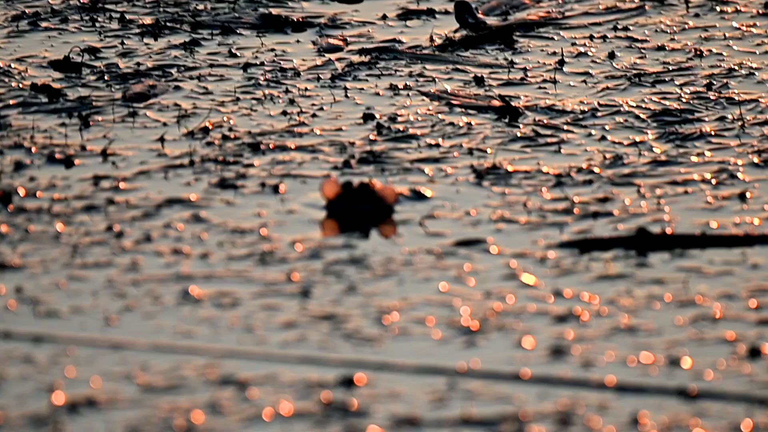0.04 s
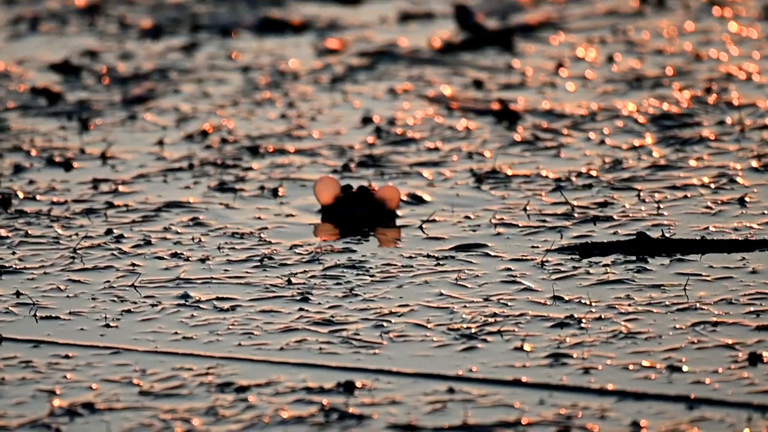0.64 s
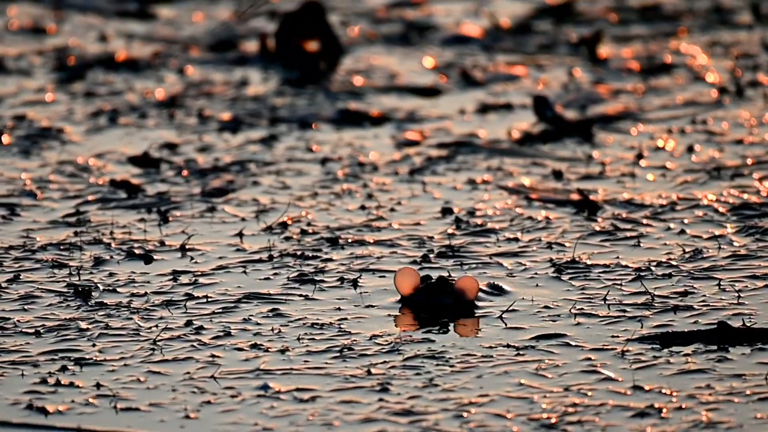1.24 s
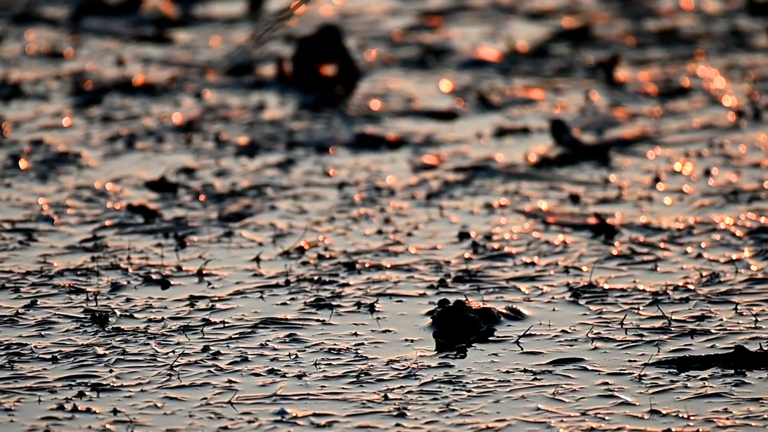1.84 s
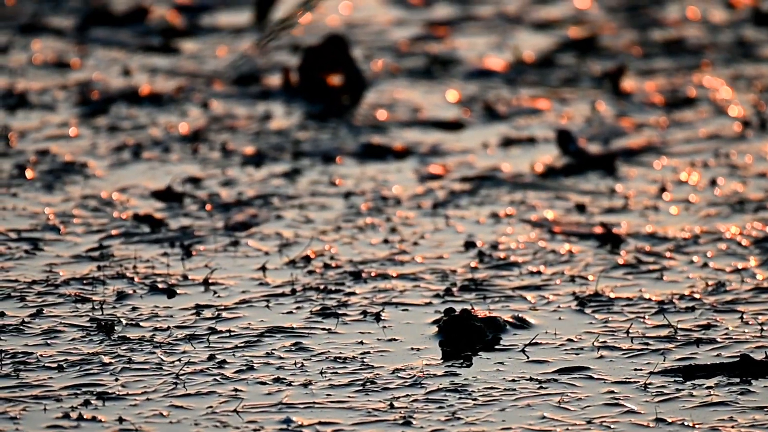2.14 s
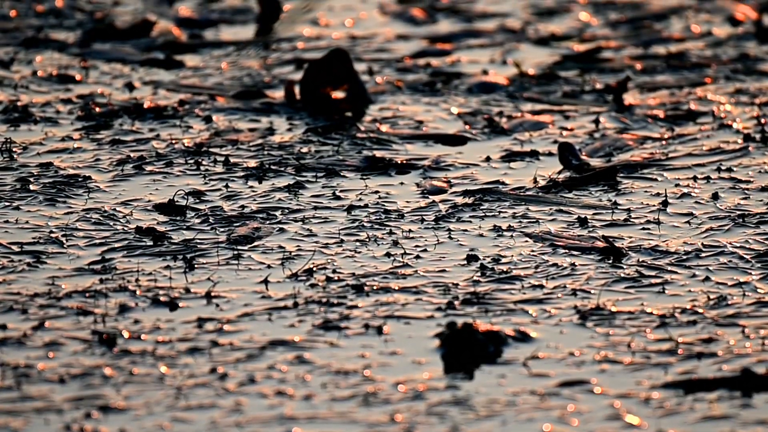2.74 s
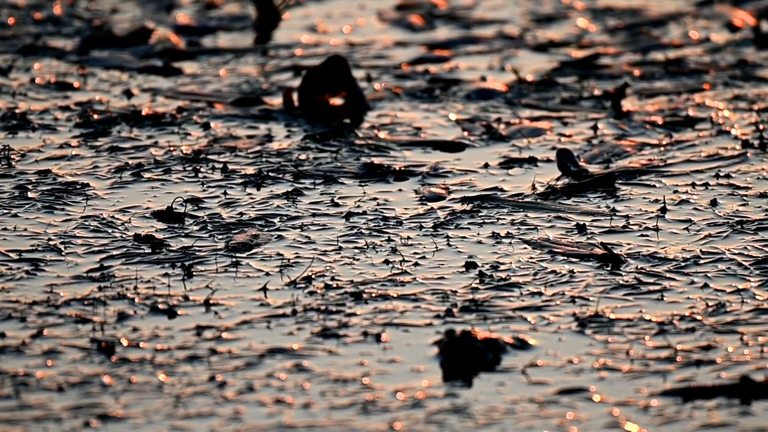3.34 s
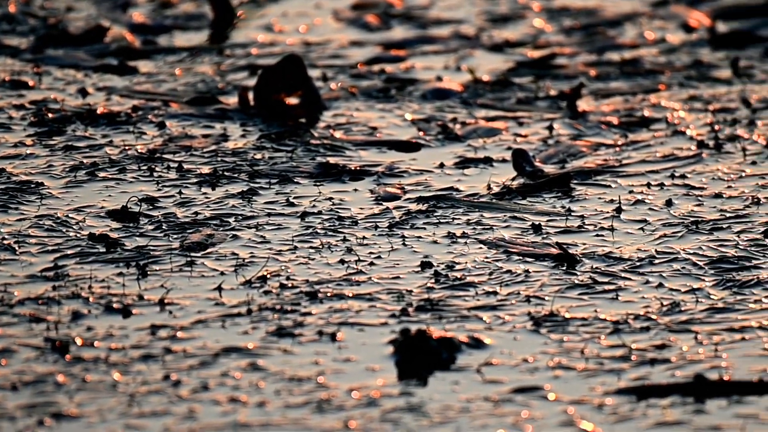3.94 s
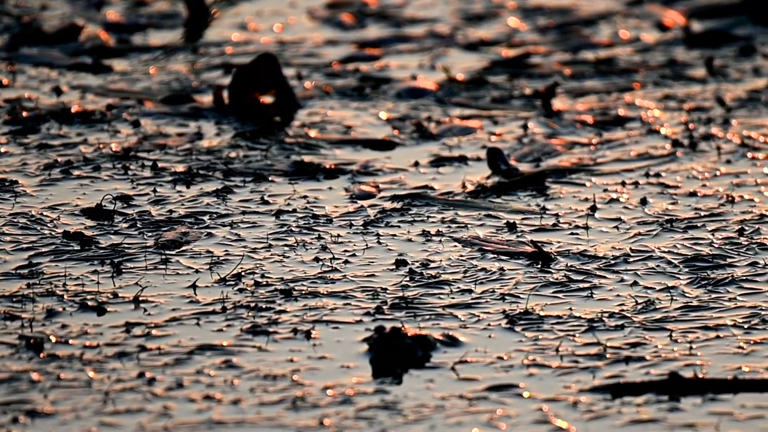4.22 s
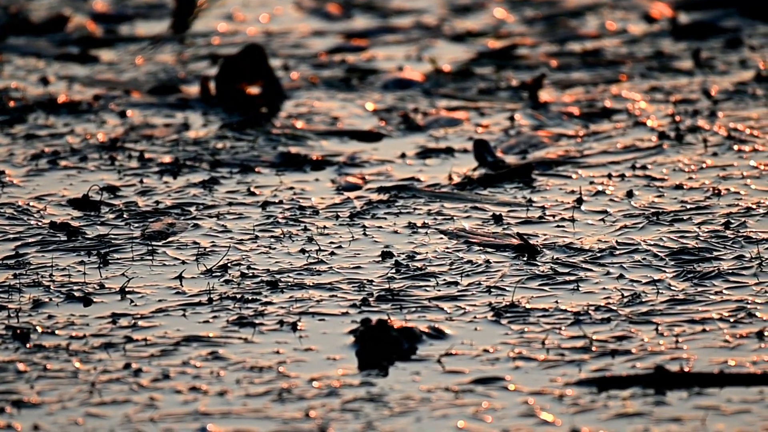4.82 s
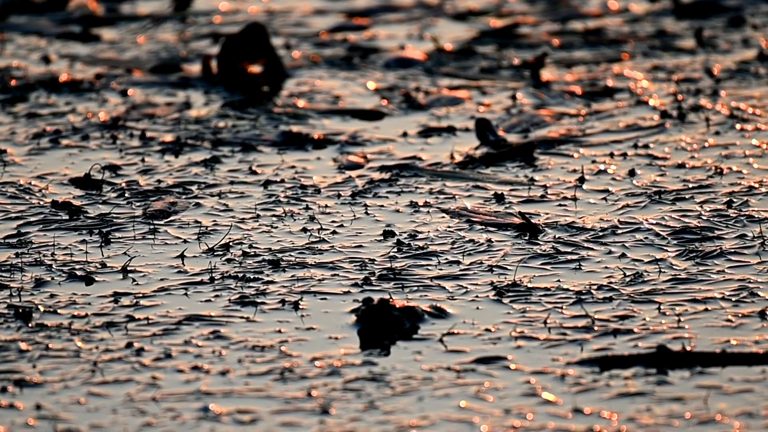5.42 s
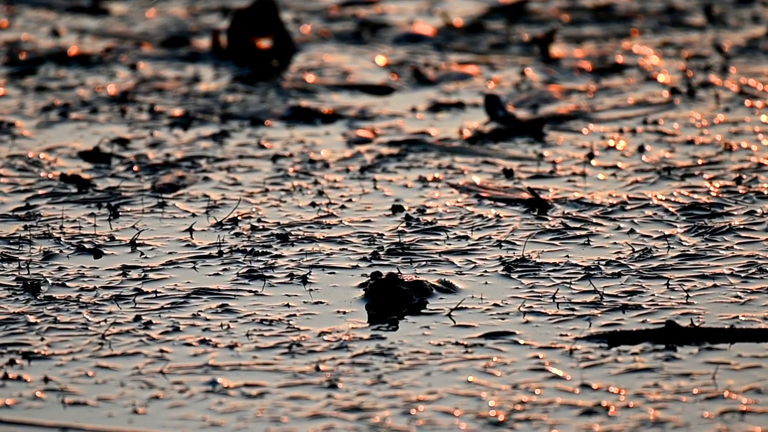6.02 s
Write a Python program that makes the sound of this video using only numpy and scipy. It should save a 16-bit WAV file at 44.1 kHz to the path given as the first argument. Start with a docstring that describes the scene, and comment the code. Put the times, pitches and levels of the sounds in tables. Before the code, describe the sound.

Several frogs call close by on an open pond, in stereo with a short echo. From 0.1 seconds a pulsed rattle and a run of sharp quacks, left and centre, sound over a low rumble with soft handling bumps. Short, rough, wavering croaks follow from about 0.7 to 2.2 seconds, and a far bird gives thin whistles between 1 and 1.5 seconds. The rumble settles by 3 seconds. Five more rattles lead, slightly right, at about 2.3, 3.1, 4, 4.8 and 5.7 seconds, each around half a second long, swelling and brightening before fading. Quacks on the left come around 2 to 2.5, 4 and 6 seconds, with croaks on the right between them. The bird returns faintly at 5.3 seconds. Throughout there is a soft hush, a distant frog chorus and scattered faint, high camera ticks, with a thin hiss swelling briefly near 0.8 and 3.2 seconds.

```python
"""Water frogs on a weedy pond at dusk, in stereo; each call is a pulse train ringing throat and sacs.
A slow rattle and sharp quacks open over a low rumble with soft handling bumps. Wavering croaks follow;
a far bird whistles at 1-1.5 s. From 2.3 s five more rattles lead, among quacks and croaks. The rumble
settles by 3 s; the bird returns at 5.3 s. Throughout: a hush, a distant chorus, faint camera ticks."""
import sys
import numpy as np
from scipy import signal
from scipy.fft import rfft, irfft, next_fast_len
from scipy.io import wavfile
from scipy.ndimage import uniform_filter1d

SR = 44100
rng = np.random.default_rng(int(sys.argv[2]) if len(sys.argv) > 2 else 0)


def output_pcm(signal):
    """Save a mono or channel-first signal as 16-bit PCM at the path in sys.argv[1].

    Samples are clipped to [-1, 1] before scaling.
    """
    pcm = np.clip(np.atleast_2d(signal).T, -1, 1) * 32767
    wavfile.write(sys.argv[1], SR, np.round(pcm).astype(np.int16))


N = 267687
TIME_S = np.arange(N) / SR
BIN_HZ = np.fft.rfftfreq(N, 1 / SR)
CROAK_ARCH = 0.083  # relative pitch rise with effort


def gain_of(db):
    return 10 ** (np.asarray(db) / 20)


def unit_rms(x):
    return x / np.sqrt(np.mean(x ** 2) + 1e-20)


def curve_at(points, hz):
    """Interpolate (freq_hz, value) points over log frequency."""
    freq_hz, value = np.transpose(points)
    return np.interp(np.log(hz + 1), np.log(freq_hz + 1), value)


def add(mix, start_s, sound):
    part = mix[max(round(start_s * SR), 0):][:len(sound)]
    part += sound[:len(part)]


def butter(x, order, edge_hz, kind="low"):
    return signal.sosfilt(signal.butter(order, edge_hz, kind, fs=SR, output="sos"), x)


def resonate(x, hz, width_hz):
    """Unity-gain resonance; the centre may move."""
    carrier = np.exp(2j * np.pi * np.cumsum(hz * np.ones(len(x))) / SR)
    pole = np.exp(-np.pi * width_hz / SR)
    return 2 * (carrier * signal.lfilter([1 - pole], [1, -pole], x / carrier + 1e-18)).real


def pulses(times_s, sizes, count):
    """Band-limited clicks at sub-sample times."""
    centre = np.asarray(times_s)[:, None] * SR
    taps = np.floor(centre) + np.arange(-7, 9)
    shape = np.sinc(taps - centre) * np.cos(np.pi * (taps - centre) / 16) ** 2
    index = np.maximum(taps, 0).astype(int)
    return np.bincount(index.ravel(), (shape * sizes[:, None]).ravel(), count)[:count]


def noise(spectrum):
    """Unit-rms noise shaped by (freq_hz, density_db) points."""
    return unit_rms(irfft(rfft(rng.standard_normal(N)) * gain_of(curve_at(spectrum, BIN_HZ)), N))


def pond(x, early_db=7, early_s=0.024, echoes_per_s=2500):
    """Sparse echoes from weed and banks, strongest at first, different at each microphone."""
    # freq_hz, t60_s
    decay = [(500, 0.45), (12000, 0.16)]
    taps = rng.standard_normal((2, SR // 2)) * (rng.random((2, SR // 2)) < echoes_per_s / SR)
    taps[:, :SR // 400] = 0  # 2.5 ms pre-delay
    hz, t, bands = signal.stft(taps, SR, nperseg=128)
    fade = gain_of(-60 * t / curve_at(decay, hz)[:, None])
    early = gain_of(early_db) * np.exp(-t / early_s)
    tail = signal.istft(bands * (fade + early), SR)[1]
    tail /= np.linalg.norm(tail, axis=1, keepdims=True)
    return signal.fftconvolve(x[None], tail, axes=1)[:, :N]


def place(x, pan_db, lead_ms, echo_db):
    """The nearer microphone hears a source earlier and louder (positive: left); the pond echoes."""
    side, size = np.array([[.5], [-.5]]), next_fast_len(N)
    shift = np.exp(2j * np.pi * np.fft.rfftfreq(size, 1 / SR) * side * lead_ms / 1000)
    direct = irfft(rfft(x, size) * shift, size)[:, :N]
    return gain_of(side * pan_db) * (direct + gain_of(echo_db) * pond(x))


def hush(level_db=-45.5):
    """Steady open air, wider toward the treble."""
    # freq_hz, density_db
    spectrum = [(15, -8.5), (25, -7.5), (249, -7), (363, -15.5), (503, -10), (734, -8), (863, -11.5),
                (1160, -10), (1370, -20), (2800, -19), (4250, -29), (16000, -45.5)]
    # freq_hz, left_right_coherence
    likeness = [(500, 0.93), (2000, 0.47), (12000, 0.067)]
    coherence = curve_at(likeness, BIN_HZ)
    width = np.sqrt((1 - coherence) / (1 + coherence + 1e-6))
    mid = noise(spectrum)
    side = irfft(rfft(noise(spectrum)) * width, N)
    return gain_of(level_db) * np.array([mid + side, mid - side])


def rumble(bumps_db=4.5):
    """A low rumble with soft handling bumps; it settles."""
    # freq_hz, density_db
    spectrum = [(25, -1), (60, 5), (115, -1.5), (250, -39), (3000, -120)]
    # time_s, level_db
    envelope = [(.1, -48), (1.4, -52), (2, -54), (3, -63)]
    settling = gain_of(np.interp(TIME_S, *np.transpose(envelope))) * noise(spectrum)
    return settling * gain_of(bumps_db * noise([(8, 0), (30, -80)]))


def hiss():
    """Thin high hiss that swells twice."""
    # freq_hz, density_db
    spectrum = [(3000, -37), (7000, -18), (10000, -14), (16000, -25)]
    # start_s, length_s, level_db
    swells = [(0.58, 0.44, -51.5), (3.02, 0.44, -54)]
    level = sum(gain_of(level_db) * np.sin(np.pi * np.clip((TIME_S - start_s) / length_s, 0, 1))
                for start_s, length_s, level_db in swells)
    return level * np.array([noise(spectrum), noise(spectrum)])


def camera_ticks(trim_db=1, scrape_s=0.00036, chatter_db=-17, chatter_s=0.006):
    """A tiny catch snaps and chatters, ringing the casing."""
    # start_s, level_db
    ticks = [(0.1218, -29.5), (.503, -35), (0.769, -28.5), (0.83, -30), (0.914, -28.5), (.968, -33),
             (1.0363, -28.5), (1.0856, -26.5), (1.1908, -31), (2.169, -26), (2.2042, -27), (2.2194, -28.5),
             (2.3887, -31), (4.197, -33), (4.219, -30), (5.4058, -29), (5.4271, -29.5), (5.5645, -26),
             (5.5854, -27.5), (5.7656, -28), (5.784, -28.5)]
    # freq_hz, width_hz, gain_db
    casing = [(4770, 910, 3), (6750, 130, 10), (7740, 230, 10), (9300, 1500, -18), (11300, 410, 1)]
    out, t = np.zeros(N), np.arange(SR // 50) / SR
    envelope = t / scrape_s * np.exp(1 - t / scrape_s) + gain_of(chatter_db) * np.exp(-t / chatter_s)
    for start_s, level_db in ticks:
        snap = rng.standard_normal(len(t)) * envelope
        ring = sum(gain_of(gain_db) * resonate(snap, hz, width_hz) for hz, width_hz, gain_db in casing)
        ring = butter(ring, 6, 4700, "high")
        add(out, start_s, gain_of(level_db + trim_db) * ring / abs(ring).max())
    return out


def bird():
    """Thin, distant whistles, each slurred through three pitches."""
    # start_s, length_s, level_db, first_hz, middle_hz, last_hz
    whistles = [(1.062, 0.052, -50, 5400, 5980, 6340), (1.322, .055, -68, 6300, 6370, 5400),
                (1.429, 0.088, -47.5, 6260, 5970, 4700), (5.31, 0.05, -55.5, 3920, 3470, 3170)]
    out = np.zeros(N)
    for start_s, length_s, level_db, *notes_hz in whistles:
        progress = np.linspace(0, 1, round(length_s * SR))
        pitch_hz = np.polyval(np.polyfit([0, .5, 1], notes_hz, 2), progress)
        tone = np.sin(2 * np.pi * np.cumsum(pitch_hz) / SR)
        add(out, start_s, gain_of(level_db) * np.sin(np.pi * progress) * tone)
    return out


def throat(drive, throat_hz, overtone_bend, frog, bend_above_hz=5000, skirt_ratio=1.275):
    """Pulses ring the moving throat resonance and the modes of sacs and head; high modes bend."""
    # frog: throat_width_hz, [(mode_hz, width_hz, gain_db)]
    voices = {"near": (186, [(496, 25, -6.5), (762, 480, -19.5), (1383, 1400, -22.5), (2410, 135, -2),
              (4000, 360, -22), (4995, 170, -12.5), (10280, 115, -28), (11160, 220, -30.5)]),
              "left": (250, [(677, 390, -17), (1420, 2800, -22.5), (3115, 950, -8.5), (4600, 440, -15.5),
              (5780, 240, -6), (11800, 1200, -37)]), "far": (254, [(672, 270, -13.5), (1390, 2000, -25),
              (4280, 1100, -27), (6190, 215, -12), (11500, 770, -45.5)]),
              "croak": (129, [(641.6, 380, -10.5), (837, 145, -10.5), (1364, 270, -14), (4200, 3600, -43),
              (5400, 920, -29.5), (6730, 220, -27)]), "right": (125, [(647, 310, -13), (808, 92, -10),
              (1390, 580, -21.5), (3900, 3400, -37), (5860, 170, -24.5)]),
              "rattle": (237, [(1257, 340, -13), (1900, 640, -18), (3420, 270, -26.5), (4040, 730, -27),
              (4700, 760, -27), (6516, 253, -20), (11800, 1300, -39)])}
    throat_width_hz, modes = voices[frog]
    ring = resonate(drive, throat_hz, throat_width_hz)
    ring = butter(resonate(ring, throat_hz, width_hz=2600), 4, 3300)  # soft tissue rounds each snap
    for mode_hz, width_hz, gain_db in modes:
        mode = resonate(drive, mode_hz * (overtone_bend if mode_hz > bend_above_hz else 1), width_hz)
        ring += gain_of(gain_db) * butter(mode, 3, [mode_hz / skirt_ratio, mode_hz * skirt_ratio], "band")
    radiated = butter(ring, 6, 450, "high")  # a small body gives little bass
    return radiated * SR / (2 * np.pi * throat_width_hz)


def vocal_folds(t, pitch_hz, throat_hz, rough, frog):
    """One snap a cycle into the throat, uneven when rough (0-1); levelled to unit rms."""
    phase = np.cumsum(pitch_hz) / SR
    cycle = np.arange(int(phase[-1]) + 1)
    late, strong = rng.standard_normal((256, 2))[:len(cycle)].T
    snaps_s = np.interp(cycle + .07 * rough * late, phase, t)
    drive = pulses(snaps_s, gain_of(3 * rough * strong), len(t))
    overtone_bend = (throat_hz / throat_hz.mean()) ** 0.13
    sound = throat(drive, throat_hz, overtone_bend, frog)
    return sound / np.sqrt(abs(uniform_filter1d(sound ** 2, size=600)) + 1e-12)


def chorus(level_db=-56, spread_db=4, calls_per_s=24, call_s=.16, throat_arch=.15):
    """Distant frogs croak at random; only their wash of echoes arrives."""
    out, t = np.zeros(N), np.arange(0, call_s, 1 / SR)
    effort = np.sin(np.pi * t / call_s)
    opening = 1 + throat_arch * (effort - effort.mean())
    draws = rng.random((200, 4))[:int(calls_per_s * N / SR)]
    for slot, (offset, size, pitch, note) in enumerate(draws):
        pitch_hz = np.interp(pitch, [0, 1], [297, 438.5]) * (1 + CROAK_ARCH * effort)
        throat_hz = np.interp(note, [0, 1], [1150, 2400]) * opening
        call = vocal_folds(t, pitch_hz, throat_hz, rough=0.92, frog="croak")
        add(out, (slot + offset - 1) / calls_per_s, gain_of(spread_db * size) * effort * call)
    return gain_of(level_db) * unit_rms(pond(out))


def croaks(frog, waver_depth=.035, wavers_per_s=19.6, throat_follows=.55):
    """Syllables swell and fade; the pitch arches, glides and wavers, and the throat follows."""
    # start_s, length_s, level_db, pitch_hz, glide_fraction, throat_hz, frog
    syllables = [(0.67, 0.035, -18, 392.7, -0.19, 2044, "near"),
                 (0.871, 0.11, -29.5, 441, 0.11, 1415, "croak"),
                 (0.904, 0.083, -20, 386.3, 0.17, 1893, "croak"),
                 (0.942, 0.051, -22, 384, 0.094, 1960, "near"),
                 (0.976, 0.042, -28.5, 359.7, -0.242, 2000, "croak"),
                 (1.187, 0.088, -28.5, 380, -0.042, 1950, "croak"),
                 (1.248, 0.038, -14, 401.6, 0.14, 1996, "near"),
                 (1.282, 0.081, -24, 387.6, 0.25, 1924, "croak"),
                 (1.358, .1, -31, 317.8, -0.13, 2040, "croak"),
                 (1.459, 0.046, -20.5, 374, 0.04, 1990, "croak"),
                 (1.508, 0.02, -20.5, 335.6, -0.06, 1880, "croak"),
                 (1.541, 0.02, -16.5, 374, -0.098, 1826, "croak"),
                 (1.559, 0.036, -27, 314.7, -0.14, 2010, "croak"),
                 (1.744, 0.061, -28, 435, 0.11, 1900, "croak"),
                 (1.779, 0.073, -23, 368.5, -0.19, 2040, "croak"),
                 (1.84, 0.052, -24, 319, 0.16, 1850, "croak"),
                 (2.107, 0.039, -24, 321, -0.027, 1750, "croak"),
                 (2.157, 0.035, -22.5, 340, 0.22, 1636, "croak"),
                 (2.607, 0.067, -28.5, 255.8, 0.078, 2130, "croak"),
                 (2.652, 0.075, -27, 340.8, -0.14, 1980, "right"),
                 (2.982, 0.14, -28, 342.8, -.1, 2010, "right"),
                 (4.35, 0.072, -22.5, 335.2, -0.062, 1970, "right"),
                 (4.644, 0.06, -33, 443.5, 0.11, 1900, "croak"),
                 (4.688, 0.083, -25, 340, -0.18, 2070, "right"),
                 (4.755, 0.03, -22.5, 390, 0.082, 1830, "croak"),
                 (4.777, 0.034, -18.5, 397.6, 0.14, 2024, "right"),
                 (4.802, 0.039, -28, 327, -0.41, 1900, "croak"),
                 (5.012, 0.065, -27.5, 365, .06, 2140, "croak"),
                 (5.075, 0.033, -24, 383.6, -0.084, 2010, "croak"),
                 (5.118, 0.017, -20.5, 386, 0.11, 2020, "right")]
    # frog: roughness
    roughness = {"near": .28, "croak": .55, "right": .45}
    out = np.zeros(N)
    for start_s, length_s, level_db, pitch_hz, glide, throat_hz, caller in syllables:
        if caller != frog:
            continue
        t = np.arange(0, length_s, 1 / SR)
        effort = abs(np.sin(np.pi * t / length_s))
        push = effort - effort.mean()
        waver = waver_depth * np.sin(2 * np.pi * (wavers_per_s * t + rng.random()))
        bend = 1 + CROAK_ARCH * push + glide * (t / length_s - .5) + waver
        opening = bend ** throat_follows * (1 + 0.013 * push)
        call = vocal_folds(t, pitch_hz * bend, throat_hz * opening, roughness[frog], frog)
        add(out, start_s, gain_of(level_db) * effort ** .55 * call)
    return out


def quacks(frog, rough=.38, snap_db=2.5, snap_s=0.0055, fade_db=-23.5):
    """A sudden push of air: pitch dives and recovers, throat note arches, level falls as sacs empty."""
    # start_s, level_db, fade_s, throat_hz, frog
    calls = [(0.153, -19, 0.049, 2270, "far"), (0.178, -17, 0.073, 2100, "near"),
             (0.332, -20.5, 0.07, 2700, "left"), (0.4205, -17, 0.079, 2190, "near"),
             (0.5135, -20, 0.059, 2620, "left"), (0.57, -16.5, 0.072, 2167, "near"),
             (1.1058, -15.5, 0.062, 2190, "near"), (2.068, -19.5, 0.086, 2260, "far"),
             (2.2489, -20.5, 0.081, 2540, "left"), (2.424, -20.5, 0.062, 2650, "left"),
             (3.909, -19.5, 0.074, 2310, "far"), (4.087, -19.5, 0.052, 2590, "left"),
             (4.263, -21, 0.071, 2530, "left"), (5.837, -18, 0.059, 2260, "far"),
             (6.011, -20.5, 0.06, 2490, "left")]
    # frog: attack_s, first_hz, low_hz, dive_s, recovery_hz_per_s, throat_arch_fraction
    dives = {"near": (0.0011, 640, 325, .018, 4200, 0.091), "left": (0.00082, 660, 350, .02, 560, 0.0038),
             "far": (0.0097, 790, 320, .018, 1400, .21)}
    attack_s, first_hz, low_hz, dive_s, recovery_hz_per_s, throat_arch = dives[frog]
    out = np.zeros(N)
    for start_s, level_db, fade_s, throat_hz, caller in calls:
        if caller != frog:
            continue
        t = np.arange(0, 1.4 * fade_s, 1 / SR)
        dive_hz = (first_hz - low_hz) * np.maximum(1 - t / dive_s, 0)
        pitch_hz = low_hz + dive_hz + recovery_hz_per_s * np.maximum(t - dive_s, 0)
        opening = 1 + throat_arch * (np.sin(np.pi * t / t[-1]) - .7)
        shape_db = snap_db * np.exp(-t / snap_s) + fade_db * (t / fade_s) ** 1.98
        level = np.minimum(t / attack_s, 1) * gain_of(level_db + shape_db)
        add(out, start_s, level * vocal_folds(t, pitch_hz, throat_hz * opening, rough, frog))
    return out


def rattles(rebound_db=-12, rebound_s=.0038, jitter_s=.00015, uneven_db=.6):
    """Slow pulses with weak rebounds; the call swells as its throat note climbs, then runs short of air."""
    # start_s, length_s, level_db, swell_s, hold_s, full_throat_hz, rate_hz, rate_change_hz_per_s
    calls = [(.1113, .41, -14, .075, .3, 2770, 72.4, -21), (2.301, .35, -12, .14, .27, 2800, 75.9, 23),
             (3.0778, .43, -9.3, .095, .335, 2690, 80.6, -31),
             (4.0063, .68, -13.5, .085, .28, 2740, 80.4, -28),
             (4.8438, .405, -11.3, .055, .36, 2760, 87, -59),
             (5.6818, .405, -10, .07, .34, 2980, 81.4, -37)]
    onset_db, climb_hz, throat_lag = -17.5, 1130, 1.24  # the throat fills more slowly than the level
    waver_db, waver_hz, wavers_per_s = .6, 30, 7
    tire_s, tired_db, droop_hz, droop_lead_s = 0.1, -7, 170, .06
    release_s, end_db = 0.06, -14
    out = np.zeros(N)
    for start_s, length_s, level_db, swell_s, hold_s, full_throat_hz, rate_hz, change_hz_per_s in calls:
        t = np.arange(0, length_s + .02, 1 / SR)
        phase = rate_hz * t + change_hz_per_s * t ** 2 / 2
        pulse_s = np.interp(np.arange(np.interp(length_s, t, phase)), phase, t)
        strong, late, loose = rng.standard_normal((128, 3))[:len(pulse_s)].T
        tired = np.clip((t - hold_s) / tire_s, 0, 1)
        waver = np.sin(2 * np.pi * (wavers_per_s * t + rng.random()))

        swell_db = onset_db * np.exp(-pulse_s / swell_s)
        effort_db = np.interp(pulse_s, t, waver_db * waver + tired_db * tired)
        release_db = end_db * np.maximum(1 - (length_s - pulse_s) / release_s, 0)
        sizes = gain_of(level_db + swell_db + effort_db + release_db + uneven_db * strong)
        pulse_s += jitter_s * loose
        drive = pulses(pulse_s, sizes, len(t))
        drive += pulses(pulse_s + rebound_s * (1 + 0.215 * late), sizes * gain_of(rebound_db), len(t))

        slack = np.exp(-t / (throat_lag * swell_s))
        droop = np.interp(t + droop_lead_s, t, tired)
        throat_hz = full_throat_hz + waver_hz * waver - climb_hz * slack - droop_hz * droop
        add(out, start_s, throat(drive, throat_hz, overtone_bend=1 + 0.16 * slack, frog="rattle"))
    return out


def scene():
    """Six frogs round the pond, over chorus, bird, camera, hiss, rumble and hush."""
    # frog: pan_db, lead_ms, echo_db
    seats = {"near": (-1.1, -0.025, -11.5), "left": (7.8, 0.071, -9.5), "far": (7, .08, -9),
             "croak": (-2.6, -0.057, -7.5), "right": (-4.8, -0.078, -8), "rattle": (-2.9, -0.031, -11)}
    calls = {"near": quacks("near") + croaks("near"), "left": quacks("left"), "far": quacks("far"),
             "croak": croaks("croak"), "right": croaks("right"), "rattle": rattles()}
    frogs = sum(place(sound, *seats[frog]) for frog, sound in calls.items())
    camera = camera_ticks() + gain_of(-2) * np.array([camera_ticks(), camera_ticks()])
    distant = chorus() + place(bird(), pan_db=4.5, lead_ms=.01, echo_db=5.5)
    return hush() + rumble() + hiss() + camera + distant + frogs


def record(dry, mono_below_hz=800, top_hz=12000, open_s=.097, band_limit_hz=16300):
    """Close microphone pair: mono bass, soft top, a moment's silence at the start, band limit."""
    side = irfft(rfft(dry[0] - dry[1]) / 2 * BIN_HZ ** 2 / (BIN_HZ ** 2 + mono_below_hz ** 2), N)
    heard = butter(dry.mean(0) + np.array([side, -side]), 3, top_hz)
    gate = np.clip((TIME_S - open_s) / .003, 0, 1)
    lowpass = signal.firwin(511, band_limit_hz, window=("kaiser", 9), fs=SR)
    return signal.oaconvolve(heard * gate, lowpass[None], "same")


dry = scene()
out = record(dry)
output_pcm(out)
```